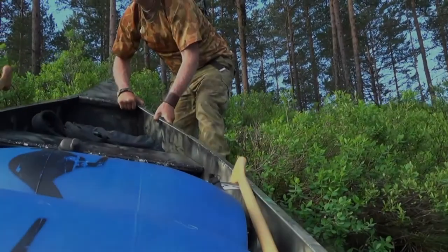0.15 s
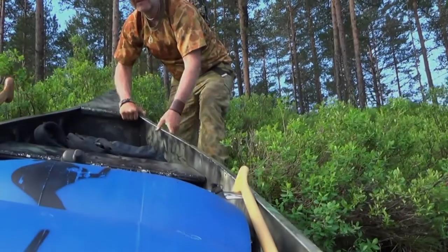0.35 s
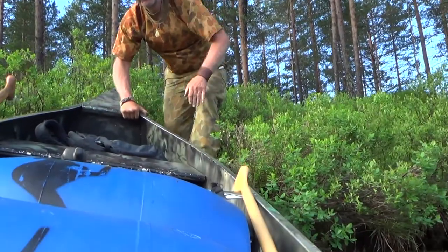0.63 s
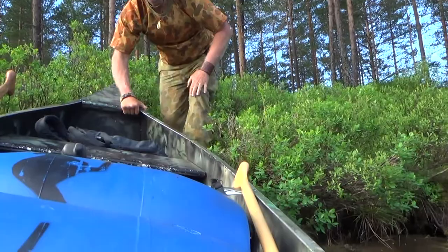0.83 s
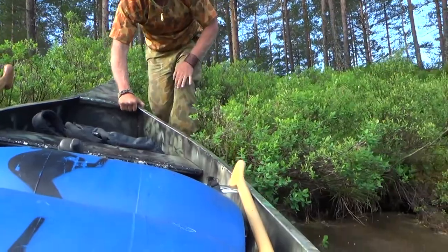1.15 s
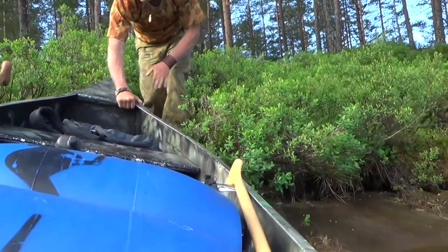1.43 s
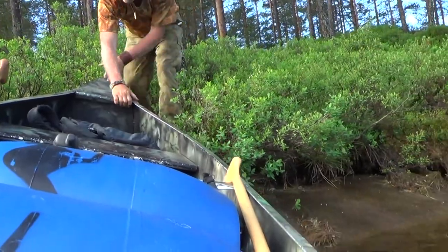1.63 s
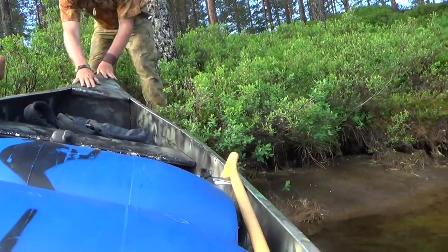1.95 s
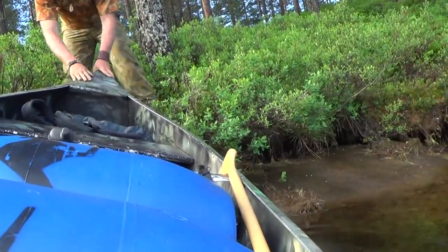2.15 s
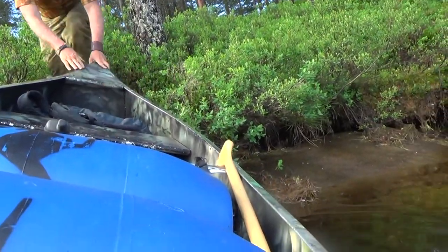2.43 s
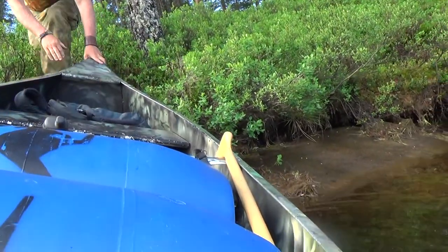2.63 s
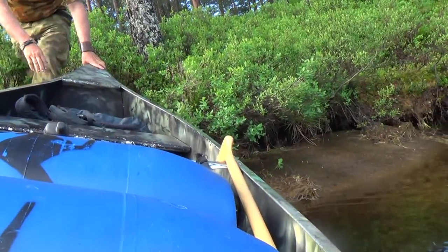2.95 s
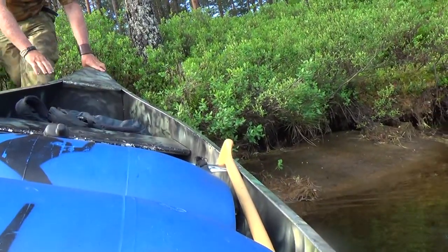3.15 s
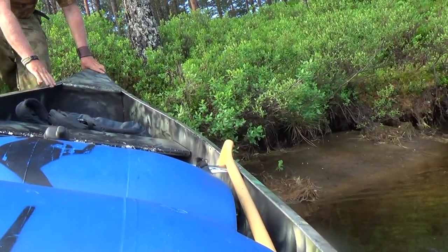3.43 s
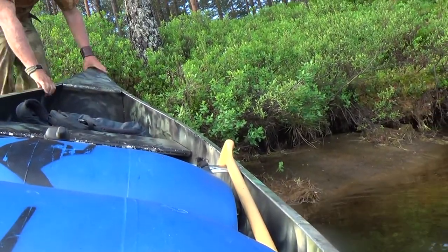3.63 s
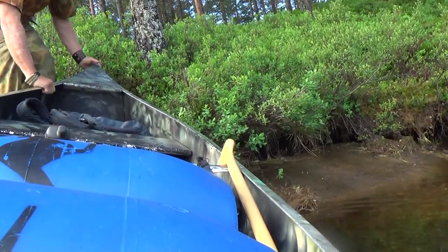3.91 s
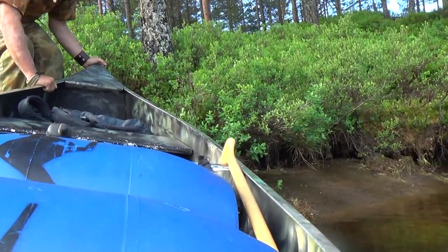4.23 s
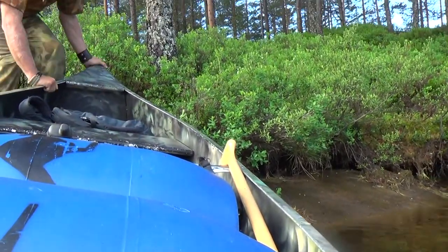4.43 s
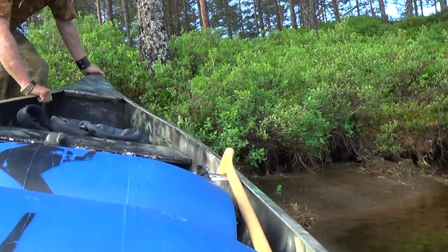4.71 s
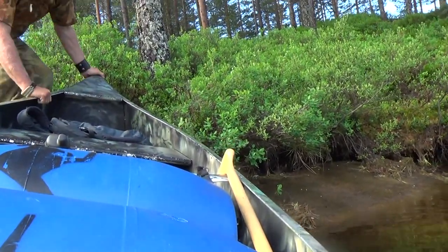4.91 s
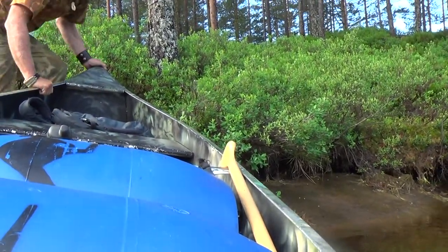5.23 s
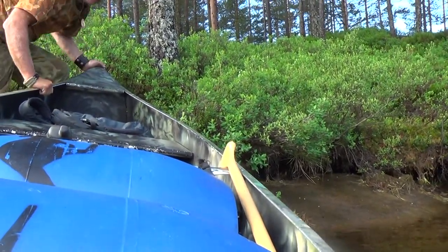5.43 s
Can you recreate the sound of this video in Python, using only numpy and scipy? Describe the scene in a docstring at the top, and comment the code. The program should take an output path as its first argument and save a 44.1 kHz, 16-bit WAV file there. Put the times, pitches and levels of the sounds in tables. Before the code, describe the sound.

From inside a canoe on a forest shore, the hull rasps, hisses and rumbles across heather with a thin high squeal, twig snaps and dull bumps. The scraping fades before three seconds, a loud hollow knock follows, then light rubbing, small taps, another knock and a brief bird whistle over soft air and water.

```python
"""On a forest lake shore, a canoe is pushed off the bank, heard from on board.
The hull hisses, rumbles, creaks and bumps over grass and heather: grains of noise, shaped by leaves and shell.
A thin wavering tone squeals along; the contact with the bank fades out from 2.18 to 2.7 s as the hull floats free.
Hands and feet knock on ringing hull modes, twigs snap in noise bursts, clothes and shrubs brush along the side,
and a small bird, a gliding sine with an echo, calls over soft air, water and rustling leaves."""
import sys
import numpy as np
from scipy import signal
from scipy.fft import rfft, irfft, next_fast_len
from scipy.io import wavfile
from scipy.ndimage import uniform_filter1d, map_coordinates

SR = 44100
rng = np.random.default_rng(int(sys.argv[2]) if len(sys.argv) > 2 else 0)


def dump(signal):
    """Clip the signal to [-1, 1] and save it as 16-bit WAV at the path in sys.argv[1]."""
    limited = np.clip(np.atleast_2d(signal).T, -1, 1)
    pcm = np.round(limited * 32767).astype(np.int16)
    wavfile.write(sys.argv[1], SR, pcm)


N = 245637
T = np.arange(N) / SR
SIZE = next_fast_len(N, real=True)
FREQS = np.maximum(np.fft.rfftfreq(SIZE, 1 / SR), 1)

# All colours are spectral shapes; the sound they shape is then scaled to its own level.
# moving air: (frequency [Hz], relative level [dB])
BUFFET_COLOUR = [(20, 0), (45, -20), (90, 0), (250, -14), (600, -18), (2000, -12), (8000, -54)]
# air in the pines and water at the shore: (frequency [Hz], relative level [dB])
FOREST_COLOUR = [(25, -38), (60, -2), (130, 2.5), (400, 4), (800, 1.5), (1500, -3), (2500, -9.5),
                 (5000, -13.5), (11000, -15.5), (14000, -17), (15500, -62)]
# brushing leaves and cloth: (frequency [Hz], relative level [dB])
BRUSH_COLOUR = [(40, -16), (150, 0), (600, 6.5), (2000, 6), (3500, 1.5), (5000, -3.5), (7000, -3.5),
                (11500, -5), (14000, -10), (16000, -45)]
FOREST_DB = -52
RUSTLE_DB = -63.5  # leaves ticking faintly against the boat

# the bird's slurred whistle: (time [s], pitch [Hz], level [dB])
BIRD_CALL = [(5.138, 3900, -68), (5.157, 4260, -59), (5.181, 4080, -68), (5.191, 5100, -62),
             (5.203, 5380, -63), (5.215, 5400, -90), (5.265, 4170, -65), (5.305, 3920, -56),
             (5.33, 3770, -62), (5.365, 3940, -55), (5.39, 3720, -76), (5.445, 3780, -80),
             (5.472, 4170, -60), (5.487, 3990, -52), (5.508, 3800, -71), (5.538, 3830, -59),
             (5.56, 3800, -78)]

# water stirred by the hull: (frequency [Hz], relative level [dB])
WASH_COLOUR = [(30, -20), (100, 3), (250, -3.5), (450, 1), (900, -9.5), (1600, -2), (2500, -15),
               (6000, -32)]
WASH_DB, WASH_RISE_S, WASH_FALL_S = -45, 0.092, 0.31  # rise and fall are time constants

# scuffs of clothes and hands: (middle [s], level [dB], half length [s], tilt [dB per octave])
SCUFFS = [(2.62, -52.5, 0.1, 0.5), (2.881, -45.5, .011, 1), (2.919, -41.5, 0.016, 3),
          (3.367, -47.5, 0.03, -1), (3.664, -48, 0.012, 2), (3.723, -43, 0.028, 0), (4.266, -52, 0.061, -3),
          (4.405, -54, 0.033, -4), (4.596, -51.5, 0.12, 0), (4.735, -45.5, 0.021, 3),
          (4.885, -52.5, 0.014, 5), (4.941, -49.5, 0.02, 0), (5.226, -50, 0.016, 0), (5.3, -53, 0.032, 1)]
SCUFF_HULL_DB = -20  # the shell's answer against the scuff
# shrubs sweeping along the side: (middle [s], level [dB], half length [s])
SWEEPS = [(1.93, -43, 0.096), (2.2, -46, 0.072), (2.44, -51, 0.051), (3.27, -56, 0.17), (3.52, -57, 0.19)]
# shrub leaves on the side: (frequency [Hz], relative level [dB])
SWEEP_COLOUR = [(200, -30), (2000, -7.5), (3500, -9), (5000, -12), (8000, -7), (9200, -1.5), (11500, -5),
                (14000, -12), (16000, -37)]

# twigs snapping against the hull: (time [s], level [dB], tilt [dB per octave], pitch of the stem [Hz],
# t60 of the crackle [s], first break against the crackle [dB])
SNAPS = [(0.2747, -15.5, 1, 2270, 0.065, -14), (.282, -18.5, -1, 2400, 0.075, -14),
         (0.510, -18.5, 4, 5200, 0.07, 0), (1.974, -25.5, -4, 2660, 0.089, -4),
         (2.077, -24, -4, 3300, 0.038, 1), (2.094, -26, -.5, 7200, 0.06, -3), (2.364, -43, 8, 8500, .05, 4),
         (2.587, -42.5, 1, 3500, .06, 0), (3.338, -21.5, 1, 7250, 0.073, -18),
         (3.713, -44, 3, 2500, .05, 0), (3.831, -49, 8, 7800, .04, 0), (3.9, -46, 0, 3200, 0.071, -2),
         (4.133, -50, -2, 6500, 0.044, 0), (4.241, -42.5, -1, 2700, 0.078, 5),
         (4.291, -42.5, -4.5, 1900, 0.077, 1), (4.374, -43, -1, 3300, .05, -2),
         (4.392, -41, 0, 5000, .04, 1), (4.421, -43, -1, 3000, .05, 0), (4.482, -32, -1, 8700, 0.055, -7),
         (4.934, -41.5, -1, 3400, 0.064, -2), (5.206, -40.5, -4.5, 2500, .08, 7),
         (5.228, -38, -15, 2900, .04, 0), (5.285, -38.5, -3, 2530, 0.068, 6.5),
         (5.329, -42.5, -2.5, 2800, 0.055, 6.5)]
# breaking wood before the stem's own resonance: (frequency [Hz], relative level [dB])
SNAP_COLOUR = [(50, -26), (150, -10), (700, 9), (1500, 8.5), (3500, 8.5), (5200, 5), (7500, 5), (11500, 5),
               (14000, -10), (16000, -25)]
STEM_DB, STEM_WIDTH = 6.5, 0.13  # height of a stem's resonance; its width as a share of its pitch
BREAK_T60_S = 0.012  # the stem's first sharp break
# the light tap that a twig gives the shell
JOLT_DB, JOLT_BRIGHT_HZ, JOLT_BASS_HZ, JOLT_TRAVEL_MS = -51, 1900, 258, 2.98

# modes of the hull: (frequency [Hz], relative level [dB])
HULL_MODES = [(108, -1.5), (128, 0), (180, -2), (197, -5.5), (238, 4.5), (268, -1), (290, 3.5), (322, -1),
              (357, -1), (386, 3.5), (420, 2), (447, 2), (484, 8), (505, -2.5), (544, 6.5), (608, -4.5),
              (680, -8), (735, -5), (850, 1.5), (925, 2), (1017, 2.5), (1136, -15), (1254, -2), (1370, 2.5),
              (1534, 4), (1665, 5.5), (2015, 3), (2363, -7), (2756, 8)]
# knocks on the hull: (time [s], level [dB], contact brightness [Hz], crack level [dB],
# crack tilt [dB per octave], spacing of the rebounds [s], thump of the weight [dB], thump delay [s],
# thump brightness [Hz], pitch of the modes with a node at the struck spot [Hz],
# damping by the hand or foot [dB per s], pitch of the panel's first flex [Hz])
KNOCKS = [(0.919, -29, 420, -49, -1, .0075, -42, 0.015, 250, 170, 13, 402),
          (1.651, -23.5, 382, -48, -1, 0.0049, -33, 0.011, 200, 170, 18, 400),
          (2.431, -36.5, 610, -45.5, -10, 0.006, -27.5, 0.013, 170, 248, 7, 347),
          (2.805, -18.5, 1850, -20, -3.5, 0.006, -14, 0.0115, 192, 300, 50, 600),
          (4.532, -20.5, 625, -27, 2, 0.0065, -24, 0.01342, 300, 170, 50, 423)]
# cracking contact of a knock: (frequency [Hz], relative level [dB])
CRACK_COLOUR = [(200, -20), (700, -4), (1200, -7), (1650, 6.5), (2000, 5), (2300, -1), (3400, -2),
                (4500, -10.5), (7000, -18), (14000, -31)]
KNOCK_BASS_HZ, KNOCK_TRAVEL_MS = 228, 0.81  # bass cut-off of a stiff spot; bending wave travel at 1 kHz
TOUCH_LEAD_S, TOUCH_DB, TOUCH_BRIGHT_HZ = 0.00447, -9, 1710  # the first graze before the full blow
REBOUND_DB, REBOUND_BASS_HZ, REBOUND_TRAVEL_MS = -3.5, 176, 4.18  # each this much weaker than the last
REBOUND_BRIGHTER = 1.23  # a lighter contact is shorter, so brighter by this factor
THUMP_BASS_SHARE, THUMP_TRAVEL_MS = 0.59, 3.05  # bass cut-off as a share of the thump's brightness
NODE_DEPTH, NODE_WIDTH = 0.99, 0.16  # share of the ring a node takes away; width as a share of its pitch
FLEX_DB, FLEX_AFTER_S = 0, 0.0011  # peak of the first flex against the knock's level; its delay
CRACK_T60_S = 0.069
SLAP_DB, SLAP_T60_S, SLAP_TILT_DB = -2, 0.043, -9.5  # first rebound's crack; level, tilt against the first
BITE_DB, BITE_T60_S, BITE_TILT_DB = 2.5, 0.02, 1.5  # brief, brighter start; level, tilt against the crack
# soft, deep bumps of the hull on the bank and of hands on the hull:
# (time [s], level [dB], contact brightness [Hz])
BUMPS = [(0.527, -21.5, 190), (.548, -34, 328), (.575, -24, 175), (0.67, -24.5, 170), (.878, -26, 130),
         (1.148, -27, 170), (2.92, -41, 350), (3.104, -42, 262), (3.345, -40, 260), (4.38, -46, 620),
         (4.425, -45, 580), (4.692, -41, 520), (4.707, -43, 400)]
BUMP_BASS_HZ, BUMP_TRAVEL_MS = 92, 3.56

# stick-slip squeal: (time [s], pitch [Hz], level [dB])
SQUEAL = [(0, 6480, -42), (.52, 6420, -39.5), (.69, 6320, -42), (.93, 6530, -39), (1.3, 6460, -36.5),
          (1.38, 6460, -38.5), (1.46, 6460, -64)]
# resonances in which the slips fall into step:
# (frequency [Hz], width [Hz], level against the rumble column of SLIDE [dB])
CHATTER = [(283, 53, -14), (409, 90, -11.5), (553, 70, -13), (792, 77, -12)]
# creaks of stems and hands along the shell, and at 1.669 s a brief ring of the hull near 400 Hz: # (middle [s],
# pitch [Hz], level [dB], half length [s])
CREAKS = [(.14, 1840, -44.5, .1), (0.91, 2760, -37.5, 0.05), (0.998, 1495, -35.5, 0.011),
          (1.166, 2810, -41, 0.021), (1.459, 740, -36, 0.026), (1.669, 402, -31.5, 0.023),
          (1.925, 2750, -42, 0.049), (2.931, 2060, -44, .004), (4.502, 1530, -41, .007)]
CREAK_WIDTH = 0.083  # width of the resonance as a share of its pitch
# the slide, before the trims in slide(): (time [s], rasp of stems [dB], rumble of the hull [dB])
SLIDE = [(0.0, -35, -41.5), (0.42, -29.5, -35.5), (0.98, -31, -33.5), (1.39, -33, -35.5),
         (1.62, -35, -35.5), (2.07, -39.5, -35.5), (2.26, -45.5, -40), (2.4, -63, -50.5)]
# stems under the hull: (frequency [Hz], relative level [dB])
RASP_COLOUR = [(60, -40), (400, -44), (800, -10.5), (1100, -3.5), (1900, 1.5), (2500, -2), (3300, -0.5),
               (4600, -5.5), (6000, -5), (8000, -11.5), (14000, -57)]
# leaves along the hull: (frequency [Hz], relative level [dB])
HISS_COLOUR = [(200, -30), (2500, 2), (5000, -25), (7500, -5), (9500, 0.5), (12000, 0), (14000, -4),
               (15800, -14)]
# shell driven by coarse slips: (frequency [Hz], relative level [dB])
RUMBLE_COLOUR = [(25, -22), (55, -19.5), (80, -8), (115, -0.5), (170, 2.5), (280, -4), (420, 0.5),
                 (560, -1), (680, 2.5), (820, 0.5), (1100, -4.5), (2000, -26)]
HISS_FOLLOWS, HISS_OFFSET_DB = 0.83, -9.5  # the hiss rises this many dB per dB of rasp, from this offset

# stereo balance: (frequency [Hz], left minus right [dB])
LEFT_BIAS = [(25, 4), (80, 14), (170, 14), (270, 9.5), (370, 6.5), (520, 5.5), (760, 1.5), (1300, 2.5),
             (2200, 0.05), (5000, 0), (10000, -0.5)]
# stereo spread: (frequency [Hz], diffuse side minus mid [dB])
WIDTH = [(300, -28), (1000, -20), (2200, -31), (4100, -38), (5200, -12.5), (15000, -13)]
TOP_HZ = 15800


def undb(db):
    """Decibels to gain."""
    return 10 ** (np.asarray(db) / 20)


def unit(x):
    """Scale to rms 1."""
    return x / np.sqrt(np.mean(x ** 2))


def curves(table):
    """Each column of a table, joined by straight lines in time."""
    s, *columns = np.transpose(table)
    return [np.interp(T, s, column) for column in columns]


def response(points, tilt_db=0):
    """Gain at every frequency from a colour table, tilted per octave above the bass."""
    hz, db = np.transpose(points)
    shape_db = np.interp(np.log(FREQS), np.log(hz), db)
    return undb(shape_db + tilt_db * np.log2(1 + FREQS / 500))


def resonance(hz, width_hz):
    """Gain of one resonance at every frequency, 1 at its centre."""
    return 1 / (1 + ((FREQS / hz - hz / FREQS) * hz / width_hz) ** 2)


def filtered(x, gain):
    """Filter by a frequency response."""
    return irfft(rfft(x, SIZE) * gain, SIZE)[:N]


def colour(x, gain):
    """Filter and scale to rms 1."""
    return unit(filtered(x, gain))


def walk(rate):
    """Random levels, rate per second, joined by slopes and scaled to rms 1."""
    hold = max(int(SR / rate), 1)
    steps = np.repeat(rng.standard_normal(N // hold + 1), hold)
    return unit(uniform_filter1d(steps, hold)[:N])


def grains(rate, spread_db):
    """Tiny slips and breaks at random moments, rate per second, with sizes spread in dB."""
    size = undb(spread_db * np.minimum(rng.standard_exponential(N), 5))
    return (rng.random(N) < rate / SR) * size * rng.choice([-1, 1], N)


def add(out, s, x):
    """Mix x into out from time s on."""
    i = int(s * SR)
    out[i:i + len(x)] += x[:N - i]


def swell(s, half_s):
    """A smooth rise and fall around time s."""
    return np.exp(-.5 * ((T - s) / half_s) ** 2)


def drift(x, depth_db, rate):
    """Each half-octave band swells and fades on its own, as when a contact spot or the air shifts."""
    place = np.clip(2 * np.log2(FREQS / 700), 0, 8)
    moving = np.zeros(N)
    for band in range(9):
        share = np.maximum(1 - abs(place - band), 0)
        moving += filtered(x, share) * undb(depth_db * walk(rate))
    return unit(moving)


def wander(x, share, rate):
    """The load on the shell shifts, so its pitch strays by a small share."""
    return map_coordinates(x, [np.cumsum(1 + share * walk(rate))], order=1, mode="mirror")


def resonant_noise(hz, width_hz):
    """A rough, pitched rub: noise in one resonance."""
    return colour(rng.standard_normal(N), resonance(hz, width_hz))


def crackle(fibres, t60, attack_s=0.00058, low_hz=280):
    """A burst of breaking fibres that dies away quickly; thin things radiate little bass."""
    t = T[:SR // 5]
    start = rng.integers(N - len(t))
    envelope = undb(-60 * t / t60) * (1 - np.exp(-t / attack_s))
    bass_cut = signal.butter(2, low_hz, "high", fs=SR, output="sos")
    return signal.sosfilt(bass_cut, fibres[start:start + len(t)] * envelope)


def hull_ring(t, travel_ms, t60_low=0.24, damping=0.41):
    """The hull's modes after a blow; high ones die sooner, bending-wave phase grows with root frequency."""
    hz, db = np.transpose(HULL_MODES)[:, :, None]
    t60 = t60_low * np.maximum(hz / 250, 1) ** -damping
    lag = 2 * np.pi * travel_ms * np.sqrt(hz / 1000)
    return np.sum(undb(db - 60 * t / t60) * np.sin(2 * np.pi * hz * t - lag), axis=0)


def gear_clatter(t, tilt_db=-3, t60_low=0.6, t60_high=0.12):
    """Loose gear shakes: octave bands of noise, the higher ones weaker and shorter."""
    t60 = np.geomspace(t60_low, t60_high, 5)
    clatter = np.zeros(len(t))
    for octave in range(5):
        hz = 250 * 2 ** octave
        band = signal.butter(2, [hz / np.sqrt(2), hz * np.sqrt(2)], "band", fs=SR, output="sos")
        fade = undb(tilt_db * octave - 60 * t / t60[octave])
        clatter += signal.sosfilt(band, rng.standard_normal(len(t))) * fade
    return clatter


def blow(bright_hz, bass_hz, travel_ms, clatter_db=-8):
    """A blow rings hull and gear; a soft contact leaves out the treble, a stiff spot the bass."""
    t, early = T[:SR // 3], slice(SR // 50)
    ring, clatter = hull_ring(t, travel_ms), gear_clatter(t)
    both = ring / np.std(ring[early]) + undb(clatter_db) * clatter / np.std(clatter[early])
    soft = signal.butter(2, bright_hz, fs=SR, output="sos")
    stiff = signal.butter(4, bass_hz, "high", fs=SR, output="sos")
    return signal.sosfilt(np.vstack([soft, stiff]), both / np.std(both[early]))


def buffet(db=-69):
    """Faint moving air, unrelated left and right."""
    return undb(db) * np.array([colour(rng.standard_normal(N), response(BUFFET_COLOUR)) for _ in range(2)])


def forest(flicker_db=1.3):
    """Soft air in the pines and water at the shore as flickering noise, with fine grains of leaf rustle."""
    air = drift(colour(rng.standard_normal(N), response(FOREST_COLOUR)), depth_db=flicker_db, rate=46)
    leaves = colour(grains(rate=440, spread_db=2.5), response(BRUSH_COLOUR))
    return undb(FOREST_DB) * air + undb(RUSTLE_DB) * leaves


def bird(echo_db=-11, echo_t60=0.42):
    """A thin whistle, one gliding sine, that slurs up and down and lingers between the trunks."""
    hz, db = (uniform_filter1d(curve, SR // 100) for curve in curves(BIRD_CALL))
    singing = (T > BIRD_CALL[0][0]) * (T < BIRD_CALL[-1][0])
    song = singing * undb(db) * np.sqrt(2) * np.sin(2 * np.pi * np.cumsum(hz) / SR)
    trunks = rng.standard_normal(SR) * undb(-60 * T[:SR] / echo_t60)
    echo = signal.fftconvolve(song, trunks / np.linalg.norm(trunks))[:N]
    return song + undb(echo_db) * echo


def wash():
    """Each knock rocks the hull, which stirs the water for a moment."""
    strongest = max(db for _, db, *_ in KNOCKS)
    rocking = np.zeros(N)
    stir = (1 - np.exp(-T / WASH_RISE_S)) * np.exp(-T / WASH_FALL_S)
    for s, db, *_ in KNOCKS:
        add(rocking, s, undb(db - strongest) * stir)
    water = colour(grains(rate=1400, spread_db=0.5), response(WASH_COLOUR))
    return undb(WASH_DB) * rocking * water


def scuffs(flutter_db=1.8):
    """Clothes and hands rub on the canoe in fine ticks, and the shell murmurs under them."""
    threads = grains(rate=9000, spread_db=2.0) * undb(flutter_db * walk(150))
    shell = undb(SCUFF_HULL_DB) * colour(grains(rate=810, spread_db=8.0), response(RUMBLE_COLOUR))
    out = np.zeros(N)
    for s, db, half_s, tilt_db in SCUFFS:
        cloth = colour(threads, response(BRUSH_COLOUR, tilt_db))
        out += undb(db) * swell(s, half_s) * (cloth + shell)
    return out


def shrub_sweeps(flutter_db=1.3):
    """Shrubs sweep by in swells of fine grains under a fluttering pressure."""
    pressure = sum(undb(db) * swell(s, half_s) for s, db, half_s in SWEEPS)
    leaves = colour(grains(rate=5500, spread_db=1.5), response(SWEEP_COLOUR))
    return pressure * undb(flutter_db * walk(70)) * leaves


def snaps():
    """Each twig breaks with a sharp tick, crackles on in the colour of its stem, and taps the shell."""
    out, fibres = np.zeros(N), grains(rate=12000, spread_db=2.0)
    jolt = undb(JOLT_DB) * blow(JOLT_BRIGHT_HZ, JOLT_BASS_HZ, JOLT_TRAVEL_MS)
    for s, db, tilt_db, stem_hz, t60, break_db in SNAPS:
        stem = undb(STEM_DB * resonance(stem_hz, STEM_WIDTH * stem_hz))
        twig = colour(fibres, response(SNAP_COLOUR, tilt_db) * stem)
        first_break = undb(break_db) * crackle(twig, BREAK_T60_S, attack_s=0.00047)
        add(out, s, undb(db) * (first_break + crackle(twig, t60, attack_s=0.0031)))
        add(out, s, jolt)
    return out


def flex(s, hz):
    """The struck panel gives way once and springs back."""
    u = (np.pi * hz * (T - s)) ** 2
    return (1 - 2 * u) * np.exp(-u)


def knocks(rebounds=2):
    """Each knock grazes, dents the panel with a crack, rebounds and thumps; spot and grip shape its ring."""
    out, grit = np.zeros(N), grains(rate=15000, spread_db=1.5)

    def crack(db, tilt_db, t60):
        """Breaking grit in the colour of the contact."""
        return undb(db) * crackle(colour(grit, response(CRACK_COLOUR, tilt_db)), t60)

    for (s, db, bright_hz, crack_db, tilt_db, rebound_s, thump_db, thump_s, thump_hz,
         node_hz, damping, flex_hz) in KNOCKS:
        ring = np.zeros(N)
        graze = blow(TOUCH_BRIGHT_HZ, bass_hz=148, travel_ms=1.82)
        add(ring, s - TOUCH_LEAD_S, undb(db + TOUCH_DB) * graze)
        add(ring, s, undb(db) * blow(bright_hz, KNOCK_BASS_HZ, KNOCK_TRAVEL_MS))
        for k in range(1, rebounds + 1):
            rebound = blow(REBOUND_BRIGHTER * bright_hz, REBOUND_BASS_HZ, REBOUND_TRAVEL_MS)
            add(ring, s + k * rebound_s, undb(db + k * REBOUND_DB) * rebound)
        thump = blow(thump_hz, THUMP_BASS_SHARE * thump_hz, THUMP_TRAVEL_MS)
        add(ring, s + thump_s, undb(thump_db) * thump)
        # modes with a node at the struck spot hardly sound; the hand or foot damps the rest
        at_node = signal.lfilter(*signal.iirpeak(node_hz, 1 / NODE_WIDTH, fs=SR), ring)
        out += (ring - NODE_DEPTH * at_node) * undb(-damping * np.maximum(T - s, 0))
        out += undb(db + FLEX_DB) * flex(s + FLEX_AFTER_S, flex_hz)
        add(out, s, crack(crack_db, tilt_db, CRACK_T60_S))
        add(out, s + rebound_s, crack(crack_db + SLAP_DB, tilt_db + SLAP_TILT_DB, SLAP_T60_S))
        add(out, s, crack(crack_db + BITE_DB, tilt_db + BITE_TILT_DB, BITE_T60_S))
    return out


def bumps():
    """The hull meets something soft and mostly its low modes answer."""
    out = np.zeros(N)
    for s, db, bright_hz in BUMPS:
        add(out, s, undb(db) * blow(bright_hz, BUMP_BASS_HZ, BUMP_TRAVEL_MS))
    return out


def squeal(waver_hz=36, flutter_db=3.0, octave_db=-9):
    """One spot of the hull sings as it rubs: a wavering line and its octave."""
    hz, db = curves(SQUEAL)
    phase = 2 * np.pi * np.cumsum(hz + waver_hz * walk(120)) / SR
    level = (T < SQUEAL[-1][0]) * undb(db + flutter_db * walk(70.4))
    return level * (np.sin(phase) + undb(octave_db) * np.sin(2 * phase))


def aground(lifts_s=2.18, afloat_s=2.7):
    """Share of the hull's contact with the bank, 1 until it starts to float off."""
    return np.interp(T, [lifts_s, afloat_s], [1, 0])


def chatter(wander_db=2.5, wander_rate=9):
    """The slips fall into step, and the shell chatters at a straying pitch as it rumbles."""
    _, rumble_level = curves(SLIDE)
    out = np.zeros(N)
    for hz, width_hz, db in CHATTER:
        tone = wander(resonant_noise(hz, width_hz), share=.05, rate=7)
        out += tone * undb(db + wander_db * walk(wander_rate))
    return aground() * undb(rumble_level) * out


def creaks():
    """Stems and hands creak along the shell, and once the hull rings briefly: short swells of noise in one
    resonance."""
    return sum(undb(db) * swell(s, half_s) * resonant_noise(hz, CREAK_WIDTH * hz)
               for s, hz, db, half_s in CREAKS)


def slide(rasp_db=-0.07, rumble_db=-2.5, ring_share=0.56, grit_db=-11):
    """Stems catch and slip under the hull, leaves hiss, and the shell rumbles with the coarser slips."""
    rasp_level, rumble_level = curves(SLIDE)
    hiss_level = HISS_OFFSET_DB + HISS_FOLLOWS * rasp_level
    grip = walk(44.8)  # the pressure on the stems is never even

    stems = colour(grains(rate=12000, spread_db=1.6) * undb(0.093 * grip), response(RASP_COLOUR))
    # coarser twigs and grit catch now and then
    grit = colour(grains(rate=260, spread_db=2.2), response(RASP_COLOUR))
    rasp = unit(drift(stems, depth_db=1.0, rate=22) + undb(grit_db) * grit)

    hiss = colour(grains(rate=14000, spread_db=1.5) * undb(0.33 * grip), response(HISS_COLOUR))

    slips = grains(rate=1100, spread_db=1.5) * undb(0.87 * grip)
    hull_gain = rfft(hull_ring(T[:SR // 2], 0), SIZE)
    shell = colour(slips, response(RUMBLE_COLOUR) * hull_gain)
    dull_slips = colour(grains(rate=1500, spread_db=-2.5), response(RUMBLE_COLOUR))
    rumble = unit(dull_slips + ring_share * shell)

    out = rasp * undb(rasp_level + rasp_db) + hiss * undb(hiss_level)
    return aground() * (out + rumble * undb(rumble_level + rumble_db))


def scene():
    """All lies nearly straight ahead; the bass is stronger on the left and the treble spreads most."""
    mid = forest() + bird() + wash() + scuffs() + shrub_sweeps() + snaps() + knocks() + bumps()
    mid = mid + squeal() + chatter() + creaks() + slide()
    ratio = response(LEFT_BIAS)
    # rustling comes from many leaves on both sides, so its treble differs between the ears
    diffuse = filtered(mid, response(WIDTH)) * walk(500)
    side = filtered(mid, (ratio - 1) / (ratio + 1)) + diffuse
    return np.array([mid + side, mid - side]) + buffet()


def record(dry):
    """A steep low-pass cuts the very top."""
    return signal.sosfilt(signal.ellip(10, .2, 80, TOP_HZ, fs=SR, output="sos"), dry)


dry = scene()
out = record(dry)
dump(out)
```